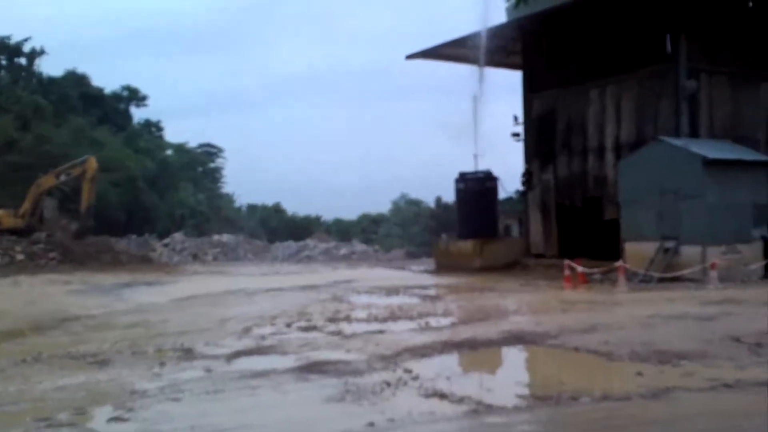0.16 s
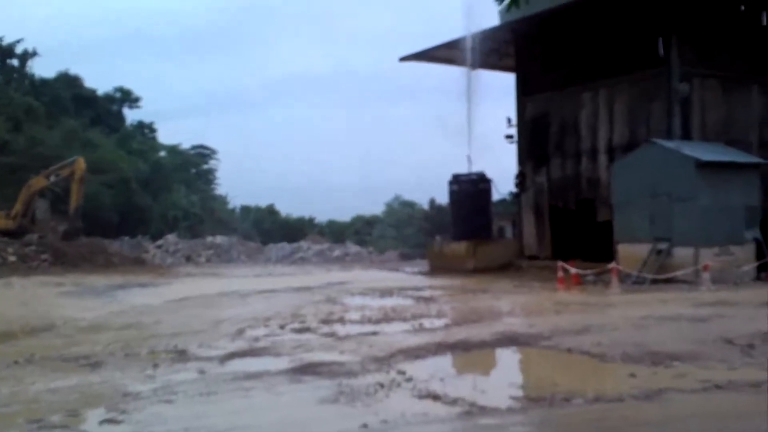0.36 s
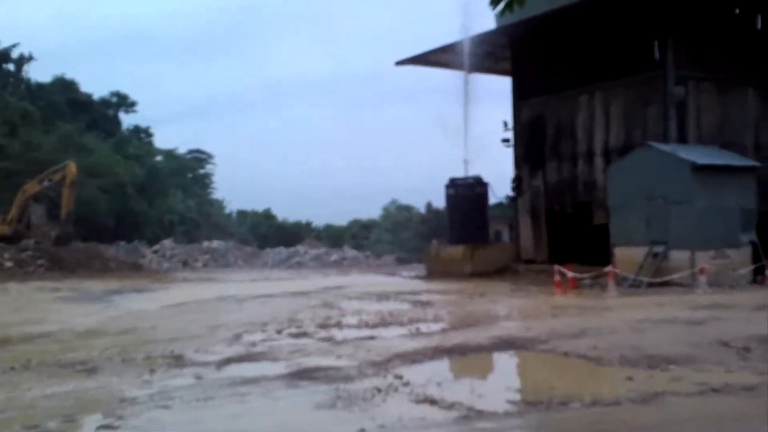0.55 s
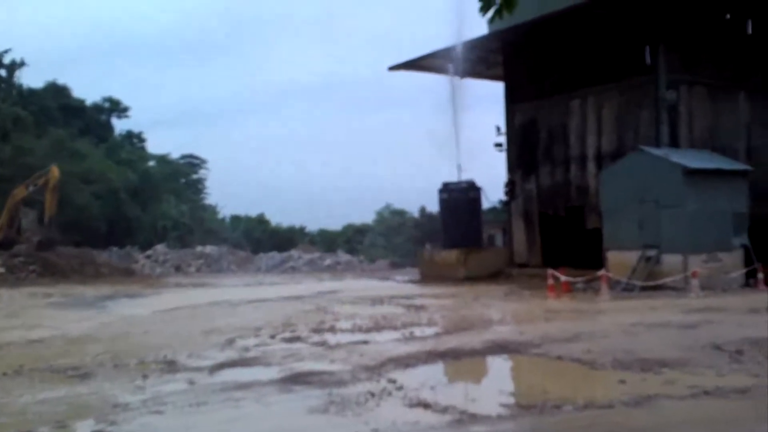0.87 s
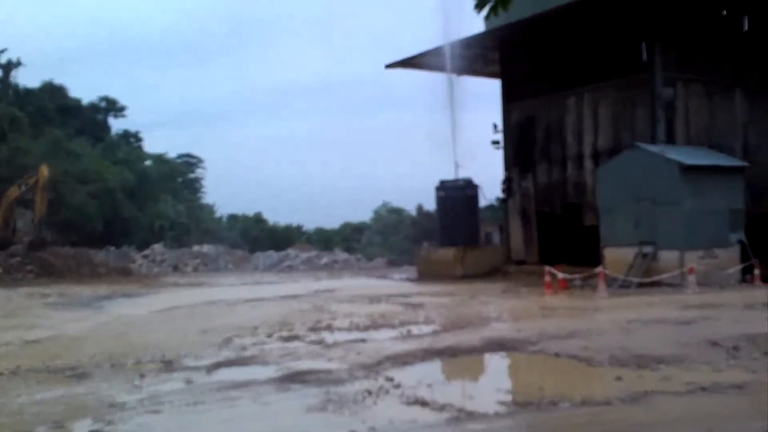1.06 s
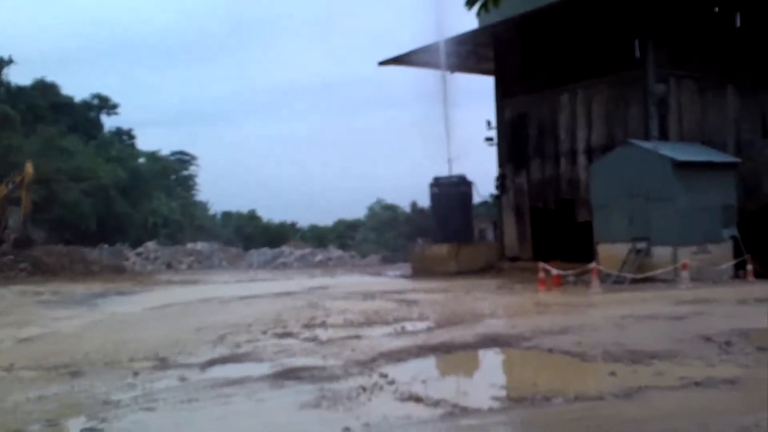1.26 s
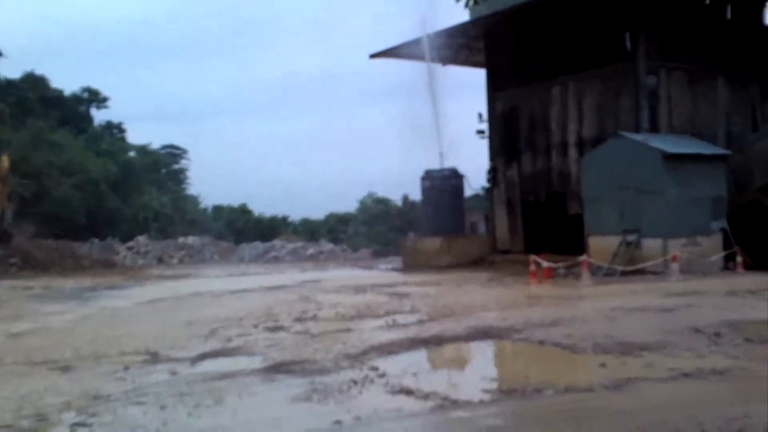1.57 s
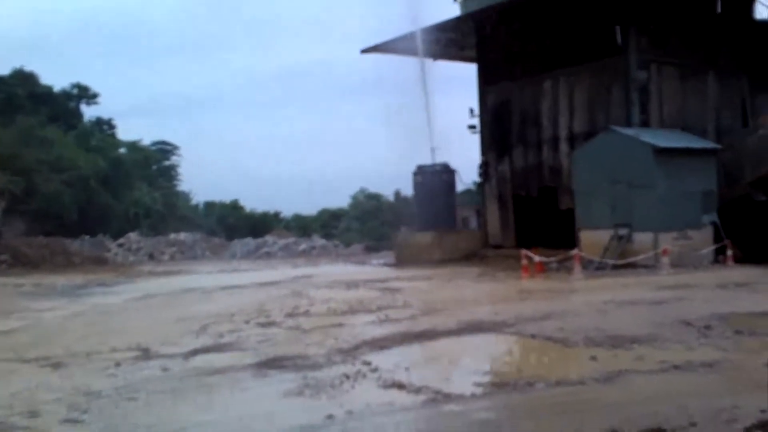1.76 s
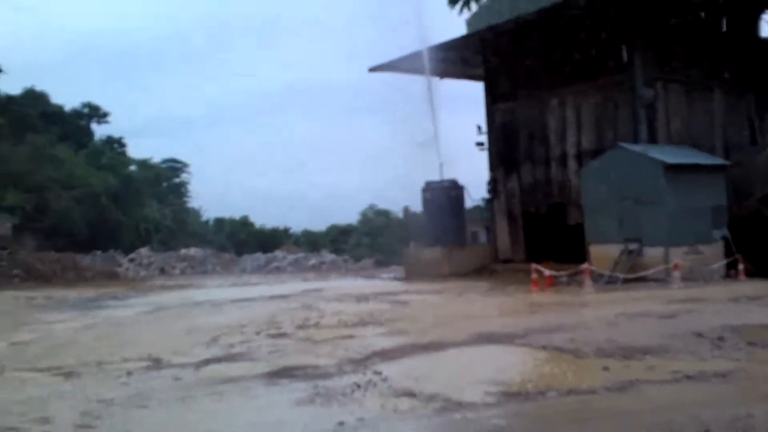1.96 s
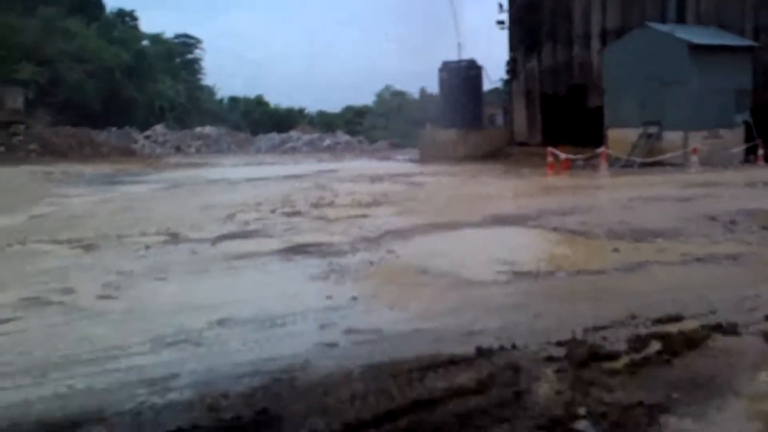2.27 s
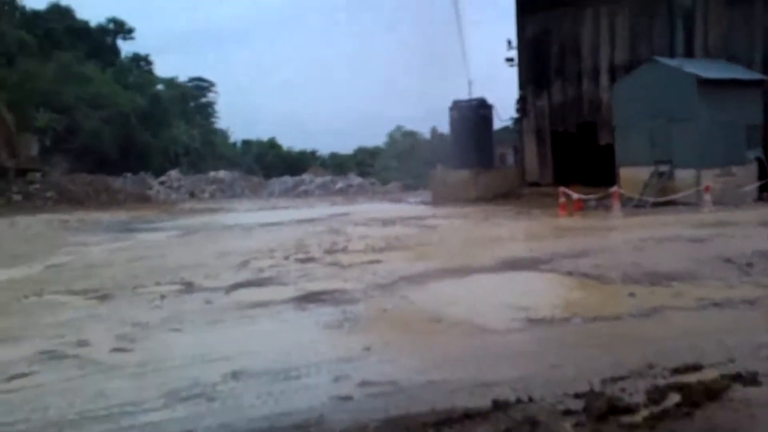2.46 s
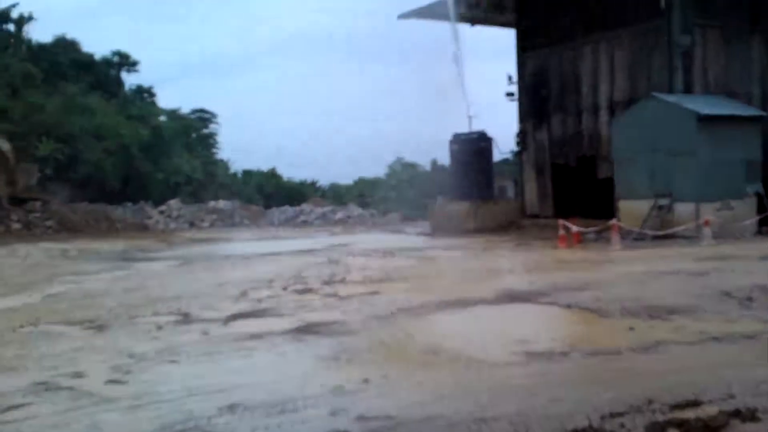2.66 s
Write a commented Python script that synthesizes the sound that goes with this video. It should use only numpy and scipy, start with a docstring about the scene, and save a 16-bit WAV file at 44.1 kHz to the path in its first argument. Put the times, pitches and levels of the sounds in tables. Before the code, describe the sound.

A water jet sprays with a thin, bright hiss over a dull distant rush in an open muddy yard; a hollow bang rattles and echoes early, then a low rumble swells with crackles and brief dropouts near the end.

```python
"""A muddy yard where a sprinkler gun throws water: band-limited random impacts over a smooth mist,
louder as the jet swings nearer, with faint, brief treble tones flickering at random, and a dull noise rush.
Early on a hollow body bangs once (decaying modes), rattles and echoes in a big shed (decaying noise).
Later a low noise rumble swells and fades; weak wind noise comes and goes.
Noise ticks crackle now and then, and the sound cuts out a few times for some milliseconds."""
import sys
import numpy as np
from scipy import signal
from scipy.fft import rfft, irfft, next_fast_len
from scipy.io import wavfile

SR = 44100
rng = np.random.default_rng(int(sys.argv[2]) if len(sys.argv) > 2 else 0)


def wav_record(signal):
    """Record a signal, one row per channel, as 16-bit PCM in the file named by sys.argv[1]."""
    frames = np.transpose(np.atleast_2d(signal))
    bounded = np.clip(frames, -1, 1)
    # unit amplitude maps onto the largest positive 16-bit level
    quanta = np.round(bounded * 32767).astype(np.int16)
    wavfile.write(sys.argv[1], SR, quanta)


N = 123479

# Spray loudness, dipping around the bang, growing later. Each row: time in seconds, level in dB.
SPRAY_LEVEL = [(0, -42.5), (.15, -39.5), (.22, -46), (.25, -38.5), (.265, -73), (.29, -38), (.318, -99),
               (.345, -44.5), (.43, -44), (.52, -41), (1.1, -39), (1.74, -36.5), (1.87, -36.5), (2.1, -37),
               (2.3, -29.5), (2.8, -34)]
# Spray spectrum. Each row: frequency in Hz, relative density in dB.
SPRAY_SPECTRUM = [(2500, -70), (3600, -57), (4400, -36), (5300, -18.5), (5750, 2.5), (6300, 9.5), (7000, 7),
                  (7750, 0.5), (8500, -22), (9400, -54.5), (11000, -67)]
# Top of the hiss. Each row: frequency in Hz, relative density in dB.
SHEEN_SPECTRUM = [(6500, -32), (7800, 1.5), (8700, 11.5), (9500, -14), (10300, -56.5)]
# Bigger drops splashing nearby. Each row: time in seconds, peak level in dB.
SPLASHES = [(.885, -38), (1.735, -34), (1.752, -33), (2.320, -23), (2.482, -29), (2.503, -25), (2.579, -29)]
DROPS_PER_S, DROP_SPREAD_DB, MIST_RE_DROPS_DB = 2400, 2.7, -5
SPRAY_LIKENESS = 0.26  # left-right, 0 to 1
SPRAY_FLUTTER_DB, SPRAY_FLUTTER_HZ = 1.2, 21
SHEEN_DB, SHEEN_DB_PER_SPRAY_DB = -42.5, 3.46

# Strength of the treble flecks by pitch. Each row: frequency in Hz, relative level in dB.
FLECK_STRENGTH = [(2300, 9.5), (3000, -9), (3800, -7), (4400, 8), (5400, -4)]
FLECK_DB, FLECK_DB_PER_SPRAY_DB, FLECK_RANGE_DB, FLECK_PAN_DB = -31.5, 0.51, 15, 10
FLECK_ATTACK_S, FLECK_T60_S = .014, .1

# Modes of the hollow body. Each row: frequency in Hz, level in dB, t60 in seconds.
BANG_MODES = [(224, -32, 0.96), (394, -15, 0.057), (569.5, -17.5, 0.5), (617, -3.5, 0.054), (665.5, -32, 1),
              (960, -15.5, 0.026), (1300, -17.5, 0.075), (2080, -34, 0.14)]
# Single wall reflections of the bang. Each row: delay in seconds, level re direct in dB.
REFLECTIONS = [(.0064, -6), (.031, -8.5), (.05, -12), (.078, -14)]
BANG_S, BANG_ATTACK_S = .2445, 0.0023
# Shed echo spectrum. Each row: frequency in Hz, relative density in dB.
ECHO_SPECTRUM = [(60, -45.5), (130, -13.5), (180, -0.5), (235, 7), (300, -8.5), (385, 6), (490, -8),
                 (600, 4.5), (820, -5), (1300, -7), (2100, -13), (2900, -16), (3700, -53), (5500, -64.5)]
# Shed echo decay. Each row: frequency in Hz, t60 in seconds.
ECHO_T60 = [(200, 1), (650, 0.87), (1400, 1), (3000, 0.043)]
ECHO_DB, ECHO_BUILD_S, ECHO_ROUGH_DB, ECHO_RIPPLE_HZ = -14, 0.012, 1.6, 55
LATE_RE_ECHO_DB, LATE_T60_S = -28.5, 0.52
# Bright rattle after the blow. Each row: frequency in Hz, relative density in dB.
RATTLE_SPECTRUM = [(700, -29), (1300, 14), (2000, -8.5), (2400, 0.5), (2600, 0), (2950, 12.5), (3200, -0.5),
                   (3450, 6.5), (3620, 6.5), (3820, 11), (4030, -16), (4250, 12), (4700, -34), (5200, -61)]
RATTLE_DELAY_S, RATTLE_HOLD_S, RATTLE_T60_S = .024, .036, .16
RATTLE_DB, RATTLE_ROUGH_DB, RATTLE_ROUGH_HZ = -33.5, 2.2, 130

# Low rumble. Each row: frequency in Hz, relative density in dB.
RUMBLE_SPECTRUM = [(30, -20), (110, -12), (210, 4), (400, -6), (720, -3), (1000, -13.5), (1800, -21),
                   (3000, -72)]
# Soft bump in the rumble. Each row: frequency in Hz, relative density in dB.
BUMP_SPECTRUM = [(25, -2), (70, 8), (140, 0), (400, -55)]
RUMBLE_PEAK_S, RUMBLE_RISE_S, RUMBLE_FALL_S, RUMBLE_DB = 2.024, 0.17, 0.22, -30.5
BUMP_S, BUMP_WIDTH_S, BUMP_DB = 2.075, .03, -40

# Crackles. Each row: start in seconds, snap pitch in Hz, snap level in dB, fizz level in dB,
# t60 in seconds.
CRACKLES = [(.661, 4300, -42, -60, .03), (.925, 5000, -46, -38, .024), (1.02, 3200, -42, -58, .03),
            (1.036, 4300, -41, -50, .03), (1.288, 3500, -42, -32, .022), (1.46, 2700, -39, -52, .028),
            (1.715, 5200, -56, -35.5, .018), (2.054, 3600, -37, -50, .024), (2.056, 2500, -44, -28, .02),
            (2.074, 4900, -32, -23, .035), (2.080, 3200, -38, -32, .025), (2.096, 3000, -31, -33, .025),
            (2.104, 4100, -34, -50, .025), (2.117, 4300, -34, -35, .028), (2.129, 3500, -48, -31, .013),
            (2.224, 2800, -38, -55, .04), (2.234, 3400, -42, -27, .035)]
# Fizz of the crackles. Each row: frequency in Hz, relative density in dB.
FIZZ_SPECTRUM = [(2500, -42), (5000, -11), (7000, 20), (9800, 9.5), (10800, -15.5), (12000, -22)]
CRACKLE_ATTACK_S, SNAP_WIDTH_OCTAVES = .0006, .35
# Brief full hiss after the longest gap. Each row: frequency in Hz, relative density in dB.
SPIT_SPECTRUM = [(1000, -12), (2500, 3.5), (5000, 5), (8000, 1), (10000, 1), (11000, -14), (12000, -42)]
SPIT_S, SPIT_HOLD_S, SPIT_T60_S, SPIT_DB = 2.258, .024, .07, -38.5

# Distant rush of jet and machinery. Each row: frequency in Hz, relative density in dB.
RUSH_SPECTRUM = [(30, -31), (70, -19.5), (130, -7.5), (190, 3.5), (340, 1), (500, -2.5), (740, 1),
                 (950, -4), (1300, -1.5), (1950, -7), (2350, -21), (2750, -87.5), (6000, -61)]
RUSH_DB, RUSH_FLUTTER_DB, RUSH_FLUTTER_HZ = -34.5, .55, 30
# Wind puffs. Each row: frequency in Hz, relative density in dB.
AIR_SPECTRUM = [(25, -5), (60, -4), (100, 15.5), (180, -14), (400, -39)]
AIR_DB, AIR_GUST_DB, AIR_GUST_HZ = -61.5, 10, 8
AIR_FADE_START_S, AIR_FADE_DB_PER_S = 2.25, 40
# Left-right likeness of far_noise. Each row: frequency in Hz, likeness from 0 to 1.
LIKENESS = [(60, 0.91), (180, 1), (700, 0.96), (1400, 0.88), (2500, 0.62), (5000, 0.1)]

# Gaps in the sound. Each row: start in seconds, end in seconds, both at half gain.
DROPOUTS = [(2.0465, 2.053), (2.0675, 2.0738), (2.0885, 2.0952), (2.110, 2.1162), (2.2188, 2.2228),
            (2.238, 2.258)]
DROPOUT_FADE_S, STOPBAND_HZ = .002, 12500


def from_db(db):
    """Decibels to gain."""
    return 10 ** (np.asarray(db) / 20)


def rms_one(x):
    """Scale to rms 1."""
    return x / np.sqrt(np.mean(x ** 2) + 1e-20)


def seconds():
    """Time of every sample."""
    return np.arange(N) / SR


def at_hz(points, hz):
    """Read a table on a log-frequency axis."""
    table_hz, values = np.transpose(points)
    return np.interp(np.log(np.maximum(hz, 1)), np.log(table_hz), values)


def drift(corner_hz):
    """Random wander of rms 1: noise through two equal low-pass poles."""
    step = 40  # samples between computed points
    pole = np.exp(-2 * np.pi * corner_hz * step / SR)
    noise = rng.standard_normal(N // step + 2002)
    slow = signal.lfilter([1], [1, -2 * pole, pole * pole], noise)[2000:]  # settled part
    return np.interp(np.arange(N) / step, np.arange(len(slow)), rms_one(slow))


def clumpy(depth_db, corner_hz):
    """Gain that comes and goes at random, extremes rounded by tanh; rms 1."""
    rounded = 1.5 * np.tanh(drift(corner_hz) / 1.5)
    return rms_one(from_db(depth_db * rounded))


def coloured(x, spectrum):
    """Causal minimum-phase filter, built by folding the cepstrum."""
    size = 2 * next_fast_len(N)
    hz = np.arange(size // 2 + 1) * SR / size
    cepstrum = irfft(np.log(from_db(at_hz(spectrum, hz))))
    cepstrum[1:size // 2] *= 2
    cepstrum[size // 2 + 1:] = 0
    response = np.exp(rfft(cepstrum))
    return irfft(rfft(x, size) * response)[..., :N]


def mid_side(mid, side, alike):
    """Left and right with correlation alike, from two independent signals."""
    return np.sqrt(1 + alike) * mid + np.sqrt(1 - alike) * side * [[1], [-1]]


def far_noise(spectrum):
    """Coloured stereo noise, its left-right likeness set by frequency; rms 1."""
    size = 2 * next_fast_len(N // 2 + 1)
    hz = np.arange(size // 2 + 1) * SR / size
    alike = np.clip(at_hz(LIKENESS, hz), 0, 1)
    mid, side = rfft(rng.standard_normal((2, size)))
    pair = irfft(mid_side(mid, side, alike))
    return rms_one(coloured(pair[:, :N], spectrum))


def spread(mid, side):
    """Place near sounds across both channels."""
    return mid_side(mid, side, SPRAY_LIKENESS) / np.sqrt(2)


def near_noise():
    """White noise with the spray's stereo width."""
    return spread(*rng.standard_normal((2, N)))


def spray_re_peak(level_db):
    """Spray level relative to the loudest in its table, in dB."""
    return level_db - np.max(SPRAY_LEVEL, axis=0)[1]


def spray():
    """Thousands of tiny uneven impacts over smooth mist, a treble sheen and bigger splashes."""
    t = seconds()
    size_db = DROP_SPREAD_DB * np.minimum(rng.exponential(1, (2, N)), 5)
    impacts = from_db(size_db) * rng.choice([-1, 1], (2, N))
    drops = rms_one(impacts * (rng.random((2, N)) < DROPS_PER_S / SR))
    mist = from_db(MIST_RE_DROPS_DB) * rng.standard_normal((2, N))
    patter = spread(*(drops + mist))

    level_db = np.interp(t, *np.transpose(SPRAY_LEVEL)) + SPRAY_FLUTTER_DB * drift(SPRAY_FLUTTER_HZ)
    body = from_db(level_db) * rms_one(coloured(patter, SPRAY_SPECTRUM))

    # the top fades faster than the body
    sheen_db = SHEEN_DB + SHEEN_DB_PER_SPRAY_DB * spray_re_peak(level_db)
    sheen = from_db(sheen_db) * rms_one(coloured(patter, SHEEN_SPECTRUM))

    width_s = .002
    bursts = sum(from_db(db) * np.exp(-((t - s) / width_s) ** 2 / 2) for s, db in SPLASHES)
    splashes = bursts * rms_one(coloured(near_noise(), SPRAY_SPECTRUM))
    return body + sheen + splashes


def flecks(count=200):
    """Faint soft-edged treble tones at random times, pitches and places, softer when the spray is weak."""
    out, age = np.zeros((2, N + SR)), np.arange(SR // 8) / SR
    envelope = (1 - np.exp(-age / FLECK_ATTACK_S)) * from_db(-60 * age / FLECK_T60_S)
    low_hz, high_hz = FLECK_STRENGTH[0][0], FLECK_STRENGTH[-1][0]
    for when, pitch, softness, place in rng.random((count, 4)):
        start = int(when * N)
        hz = low_hz + (high_hz - low_hz) * pitch
        spray_db = np.interp(start / SR, *np.transpose(SPRAY_LEVEL))
        follow_db = FLECK_DB_PER_SPRAY_DB * spray_re_peak(spray_db)
        db = FLECK_DB + at_hz(FLECK_STRENGTH, hz) + follow_db - FLECK_RANGE_DB * softness
        pan = from_db(FLECK_PAN_DB * (place - .5) * np.array([[1], [-1]]))
        tone = envelope * np.sin(2 * np.pi * hz * age)
        out[:, start:start + len(age)] += pan * from_db(db) * tone
    return out[:, :N]


def knock(start_s):
    """A soft-edged blow sets a hollow body's modes ringing."""
    age = np.maximum(seconds() - start_s, 0)
    modes = sum(from_db(db - 60 * age / t60_s) * np.sin(2 * np.pi * hz * age)
                for hz, db, t60_s in BANG_MODES)
    return np.minimum(age / BANG_ATTACK_S, 1) * modes


def shed_echo():
    """Uneven diffuse echo: noise bands, each decaying at its own rate plus a faint common tail."""
    age = np.maximum(seconds() - BANG_S, 0)
    rest, echo = far_noise(ECHO_SPECTRUM), 0
    late = from_db(LATE_RE_ECHO_DB - 60 * age / LATE_T60_S)
    for top_hz in 400 * 2 ** np.arange(5):
        band = signal.sosfiltfilt(signal.butter(2, top_hz, fs=SR, output="sos"), rest)
        rest = rest - band
        early = from_db(-60 * age / at_hz(ECHO_T60, top_hz / np.sqrt(2)))
        echo = echo + clumpy(ECHO_ROUGH_DB, ECHO_RIPPLE_HZ) * band * (early + late)
    return from_db(ECHO_DB) * (1 - np.exp(-age / ECHO_BUILD_S)) * echo


def bang():
    """The blow, its delayed wall reflections and the shed's echo."""
    reflections = sum(from_db(db) * knock(BANG_S + delay_s) for delay_s, db in REFLECTIONS)
    return knock(BANG_S) + reflections + shed_echo()


def rattle():
    """Rough bright noise just after the blow: it holds briefly, then dies fast."""
    age = seconds() - BANG_S - RATTLE_DELAY_S
    decay_db = -60 * np.maximum(age - RATTLE_HOLD_S, 0) / RATTLE_T60_S
    level_db = RATTLE_DB + RATTLE_ROUGH_DB * drift(RATTLE_ROUGH_HZ) + decay_db
    return np.clip(age / BANG_ATTACK_S, 0, 1) * from_db(level_db) * far_noise(RATTLE_SPECTRUM)


def rumble():
    """A low noise swell that rises and falls, with a soft bump shortly after its peak."""
    t = seconds()
    width_s = np.where(t < RUMBLE_PEAK_S, RUMBLE_RISE_S, RUMBLE_FALL_S)
    swell = np.exp(-((t - RUMBLE_PEAK_S) / width_s) ** 2 / 2)
    bump = np.exp(-((t - BUMP_S) / BUMP_WIDTH_S) ** 2 / 2)
    low = from_db(RUMBLE_DB) * swell * far_noise(RUMBLE_SPECTRUM)
    return low + from_db(BUMP_DB) * bump * far_noise(BUMP_SPECTRUM)


def crackles():
    """Short ticks: each a dry snap of narrow-band noise at its own pitch plus bright fizz."""
    t, out = seconds(), 0
    white = near_noise()
    fizz = rms_one(coloured(white, FIZZ_SPECTRUM))
    for start_s, hz, snap_db, fizz_db, t60_s in CRACKLES:
        edges_hz = hz * 2 ** (SNAP_WIDTH_OCTAVES * np.array([-.5, .5]))
        band_pass = signal.butter(2, edges_hz, "band", fs=SR, output="sos")
        snap = rms_one(signal.sosfilt(band_pass, white))
        age = np.maximum(t - start_s, 0)
        decay = from_db(-60 * np.minimum(age / t60_s, 2))
        envelope = np.minimum(age / CRACKLE_ATTACK_S, 1) * decay
        out = out + envelope * (from_db(snap_db) * snap + from_db(fizz_db) * fizz)
    return out


def spit():
    """A brief full noise hiss as the sound returns from its longest gap."""
    age = seconds() - SPIT_S
    level_db = SPIT_DB - 60 * np.maximum(age - SPIT_HOLD_S, 0) / SPIT_T60_S
    return (age > 0) * from_db(level_db) * rms_one(coloured(near_noise(), SPIT_SPECTRUM))


def rush():
    """Steady distant noise of jet and machinery, fluttering slightly."""
    level_db = RUSH_DB + RUSH_FLUTTER_DB * drift(RUSH_FLUTTER_HZ)
    return from_db(level_db) * far_noise(RUSH_SPECTRUM)


def air():
    """Weak lumpy wind noise that fades near the end."""
    level_db = AIR_DB - AIR_FADE_DB_PER_S * np.maximum(seconds() - AIR_FADE_START_S, 0)
    return from_db(level_db) * clumpy(AIR_GUST_DB, AIR_GUST_HZ) * far_noise(AIR_SPECTRUM)


def scene():
    """Sum of every layer in the yard."""
    treble = spray() + flecks()
    events = bang() + rattle() + rumble() + crackles() + spit()
    return treble + events + rush() + air()


def record(dry):
    """Mute the brief gaps, then cut the top with a steep low-pass."""
    t = seconds()
    shut = sum(np.clip(np.minimum(t - start_s, end_s - t) / DROPOUT_FADE_S + .5, 0, 1)
               for start_s, end_s in DROPOUTS)
    low_pass = signal.cheby2(12, 70, STOPBAND_HZ, fs=SR, output="sos")  # 70 dB down from there up
    return signal.sosfilt(low_pass, dry * np.clip(1 - shut, 0, 1))


dry = scene()
out = record(dry)
wav_record(out)
```